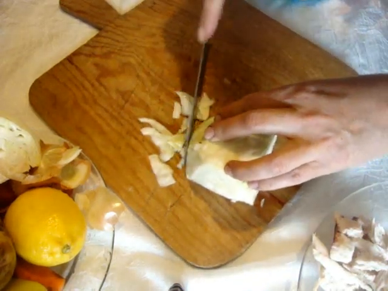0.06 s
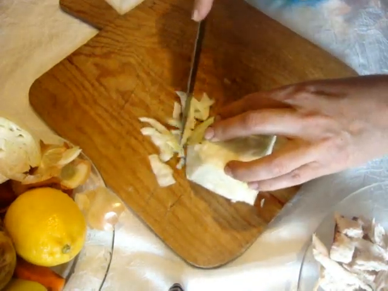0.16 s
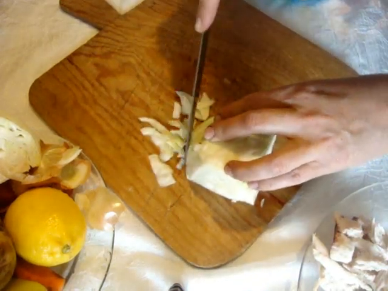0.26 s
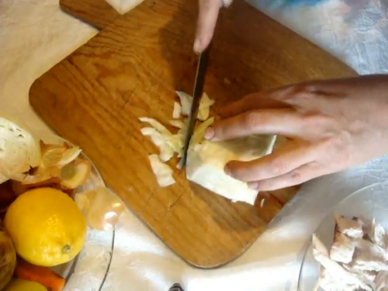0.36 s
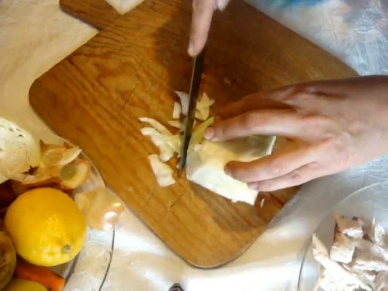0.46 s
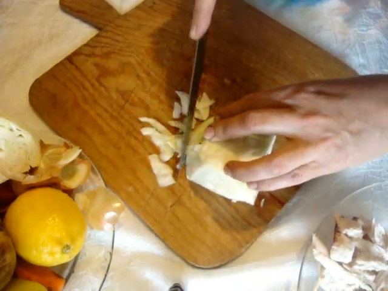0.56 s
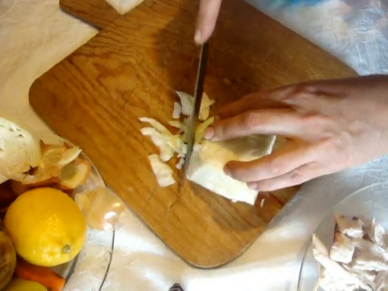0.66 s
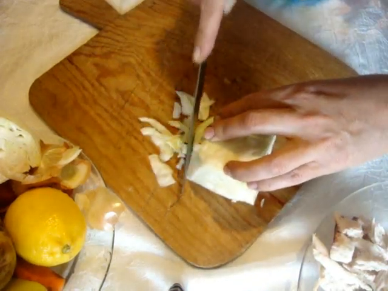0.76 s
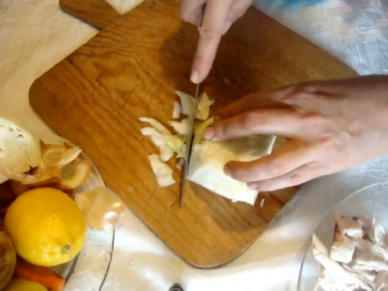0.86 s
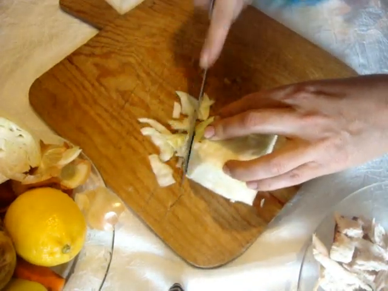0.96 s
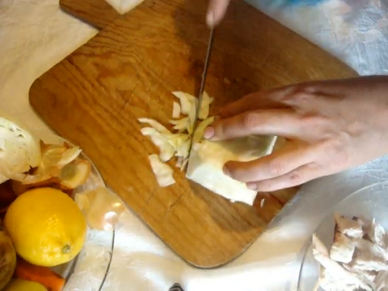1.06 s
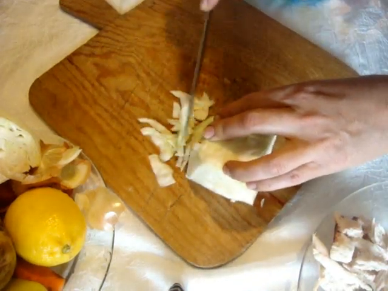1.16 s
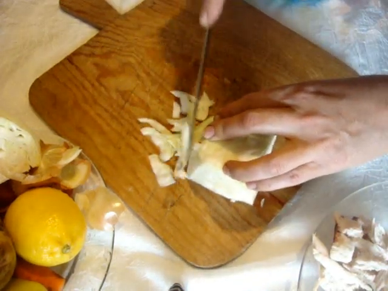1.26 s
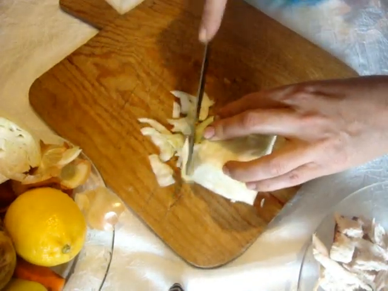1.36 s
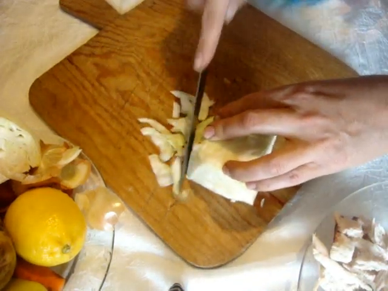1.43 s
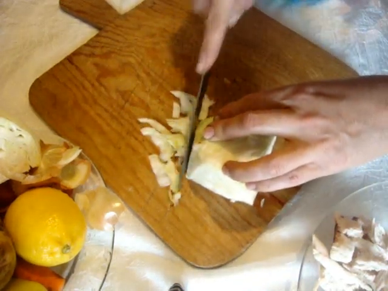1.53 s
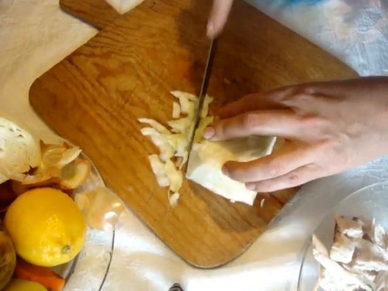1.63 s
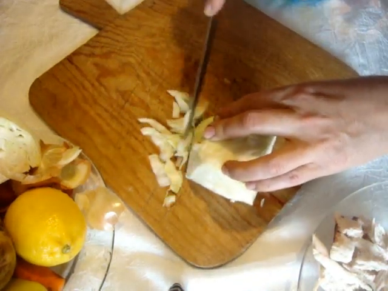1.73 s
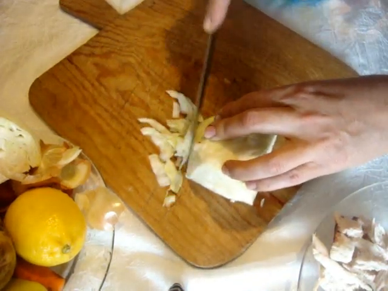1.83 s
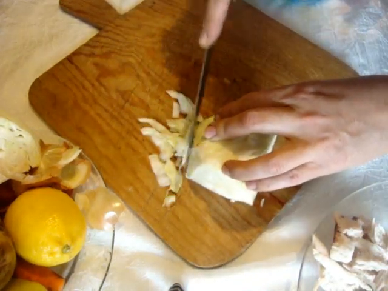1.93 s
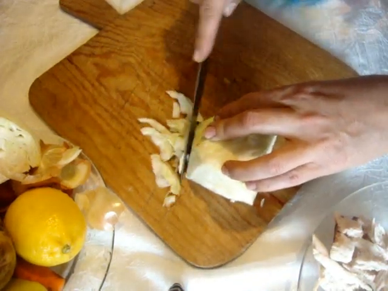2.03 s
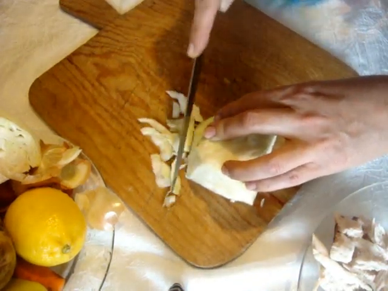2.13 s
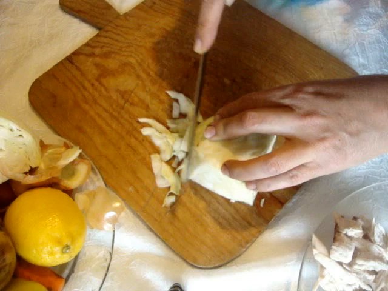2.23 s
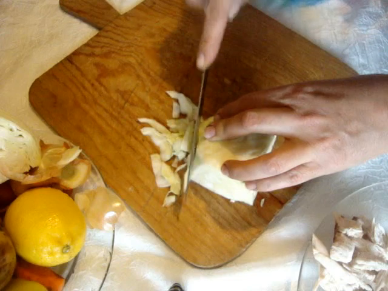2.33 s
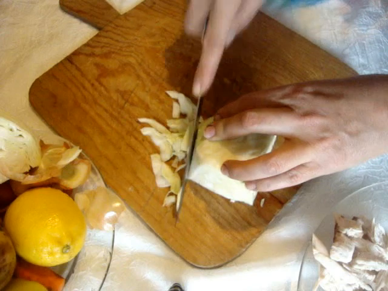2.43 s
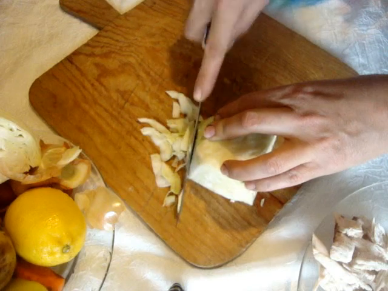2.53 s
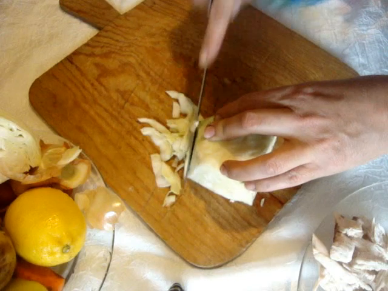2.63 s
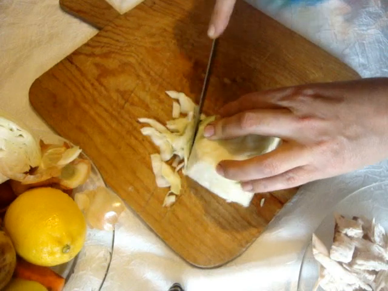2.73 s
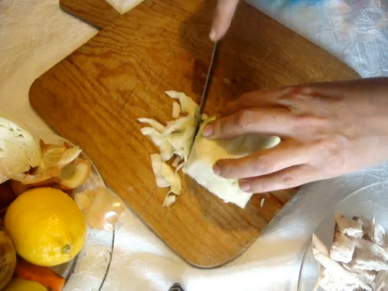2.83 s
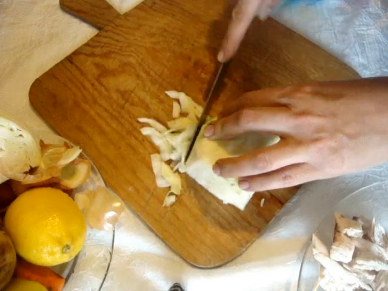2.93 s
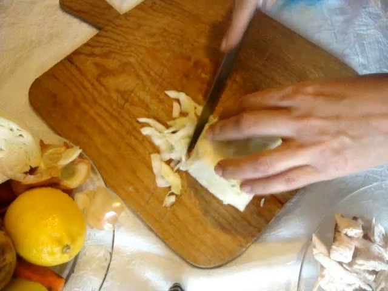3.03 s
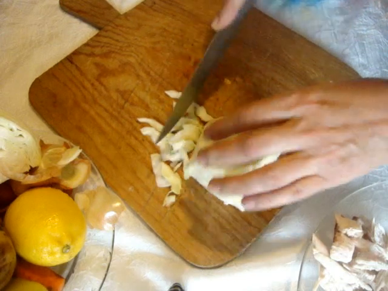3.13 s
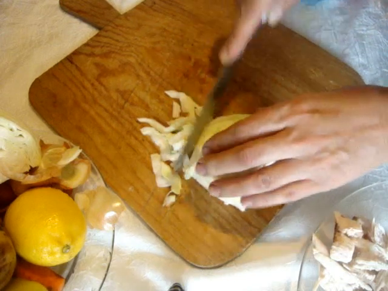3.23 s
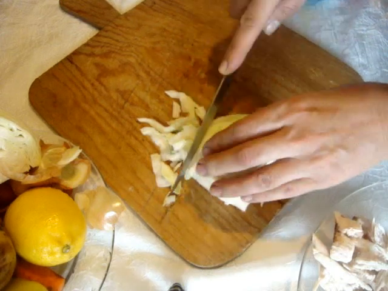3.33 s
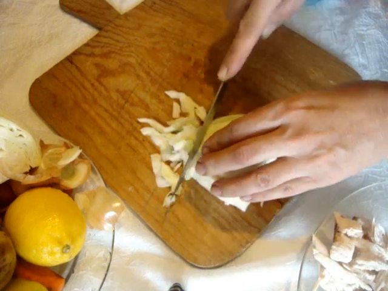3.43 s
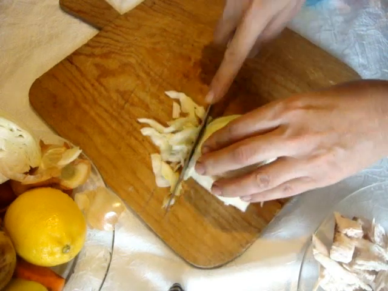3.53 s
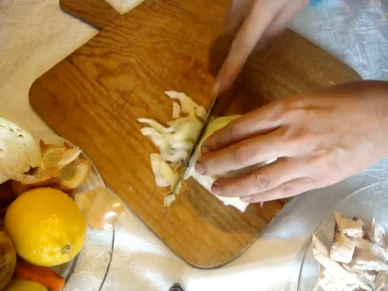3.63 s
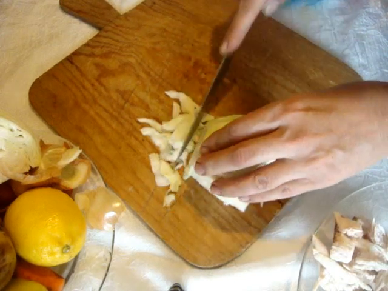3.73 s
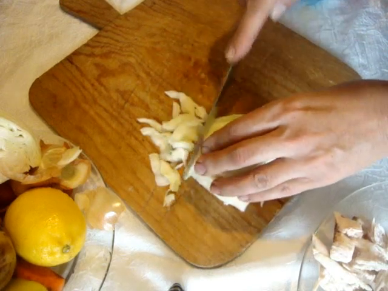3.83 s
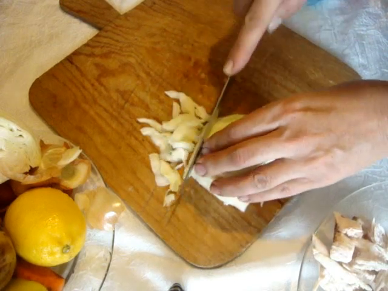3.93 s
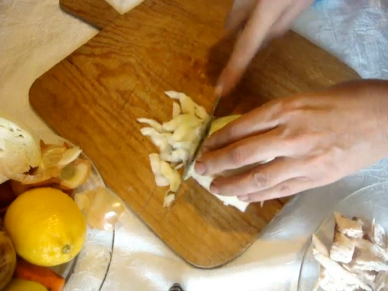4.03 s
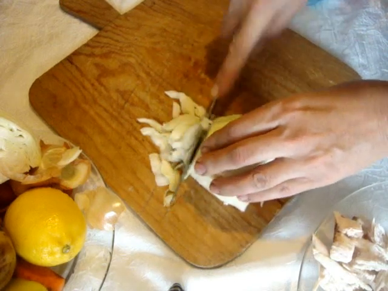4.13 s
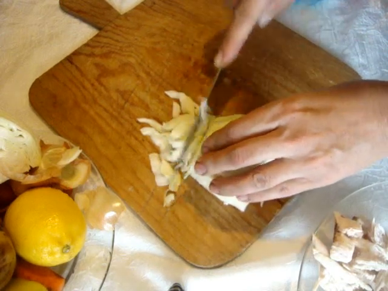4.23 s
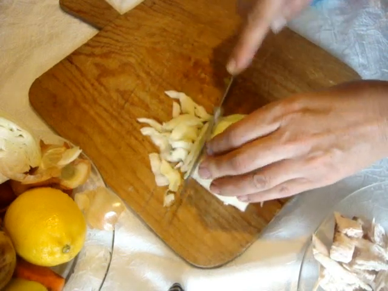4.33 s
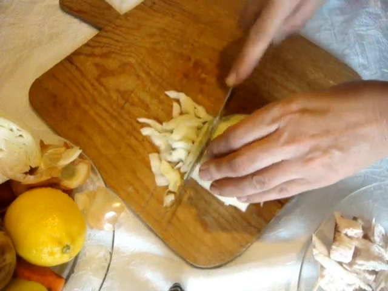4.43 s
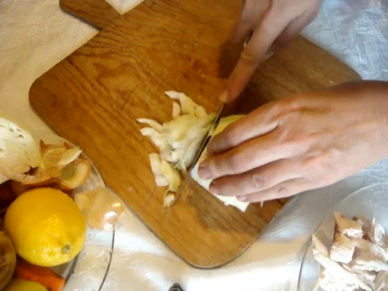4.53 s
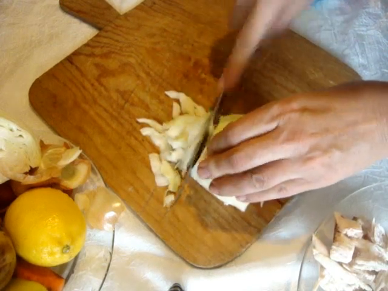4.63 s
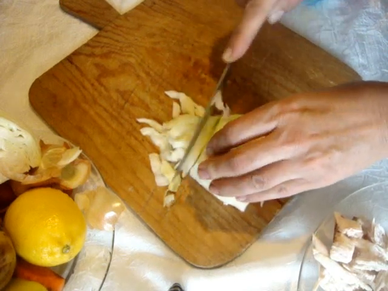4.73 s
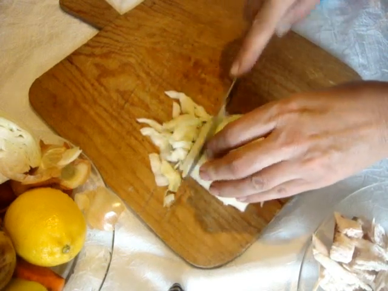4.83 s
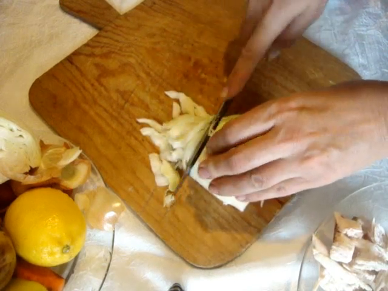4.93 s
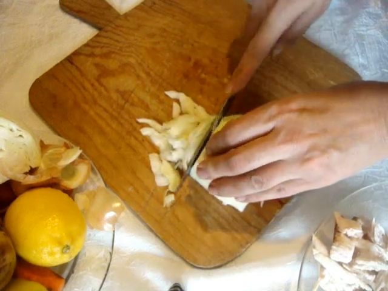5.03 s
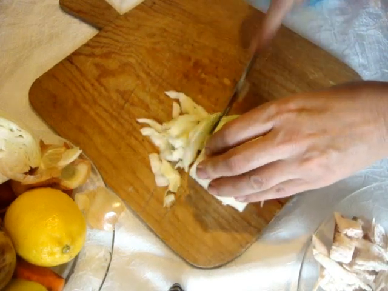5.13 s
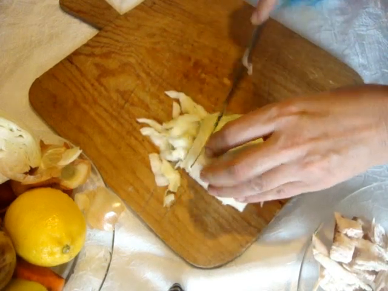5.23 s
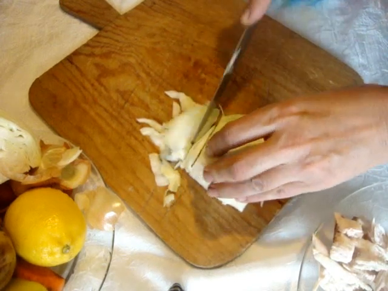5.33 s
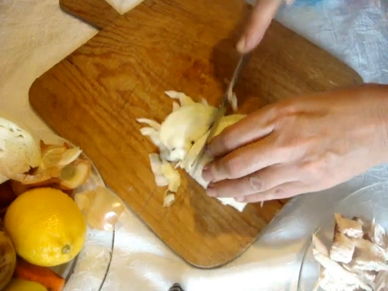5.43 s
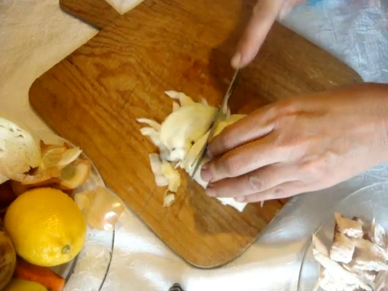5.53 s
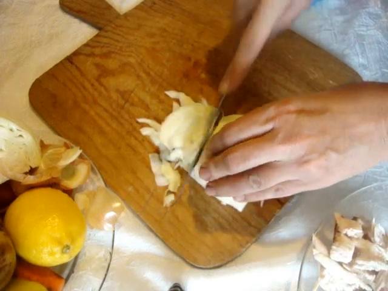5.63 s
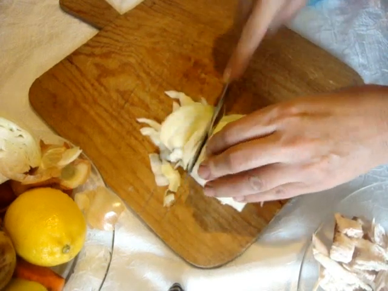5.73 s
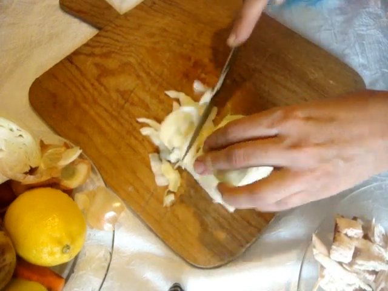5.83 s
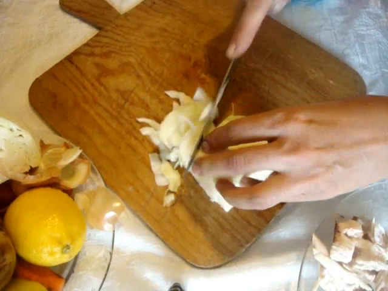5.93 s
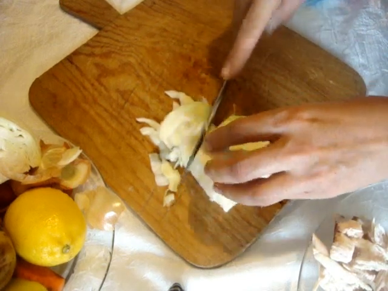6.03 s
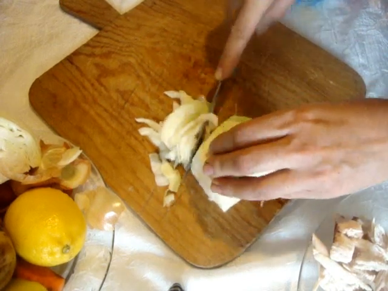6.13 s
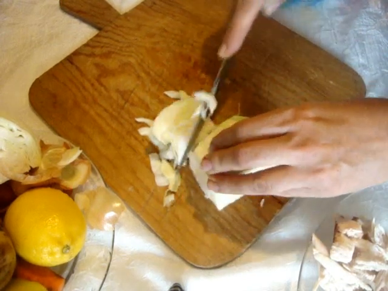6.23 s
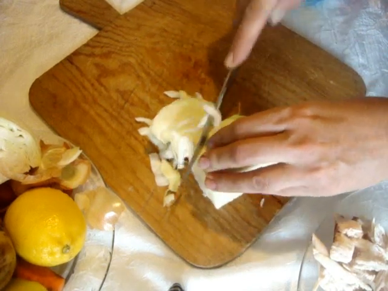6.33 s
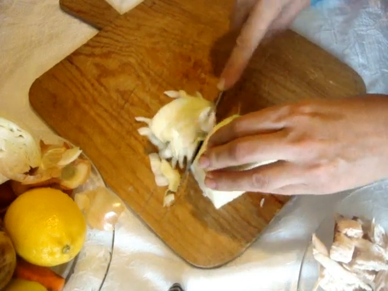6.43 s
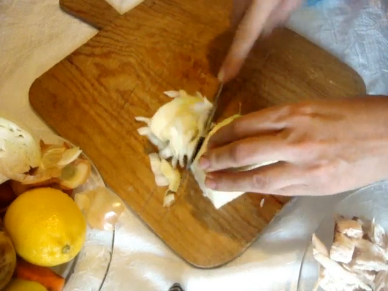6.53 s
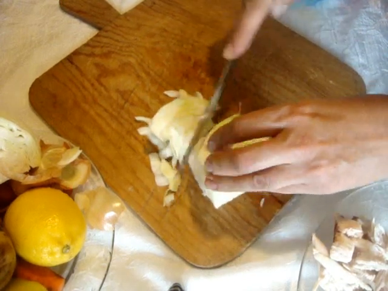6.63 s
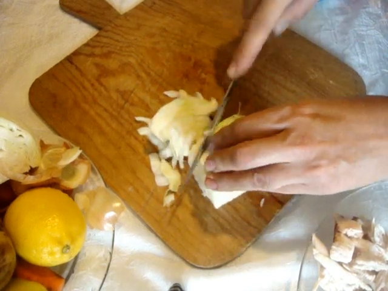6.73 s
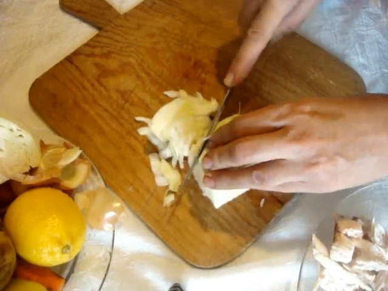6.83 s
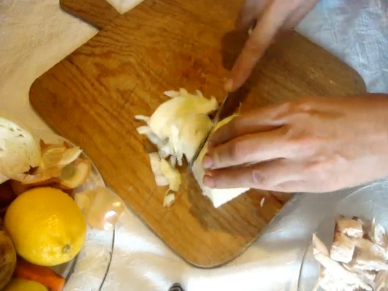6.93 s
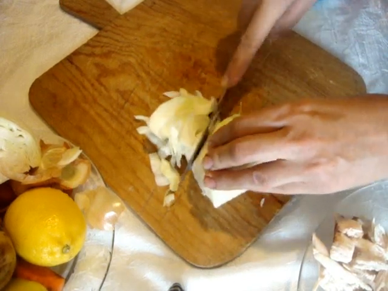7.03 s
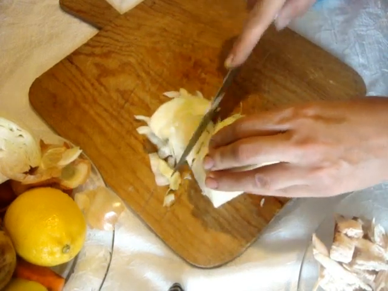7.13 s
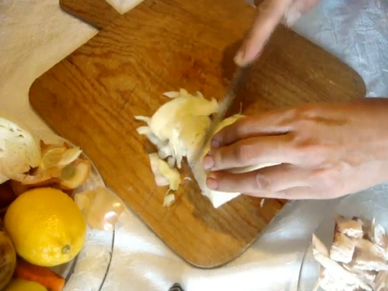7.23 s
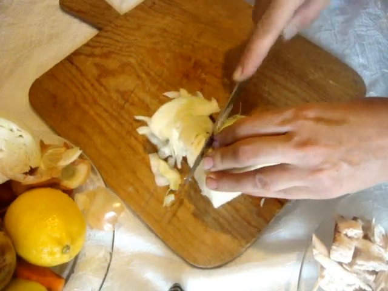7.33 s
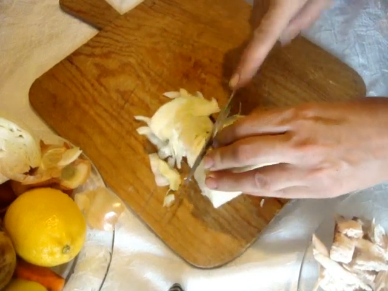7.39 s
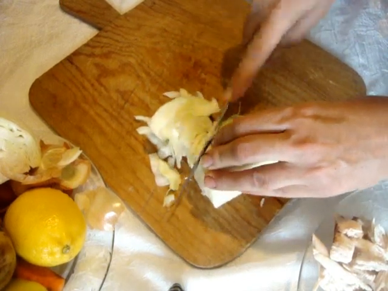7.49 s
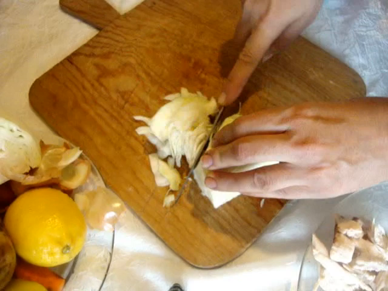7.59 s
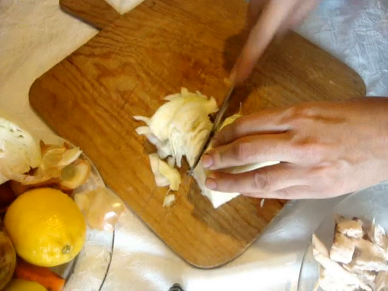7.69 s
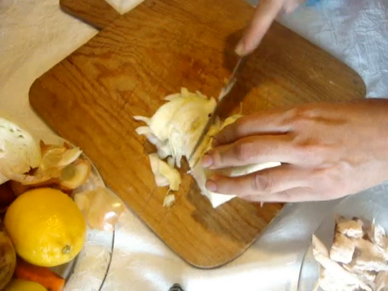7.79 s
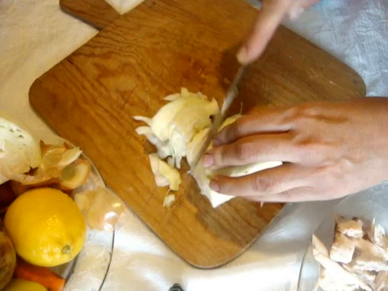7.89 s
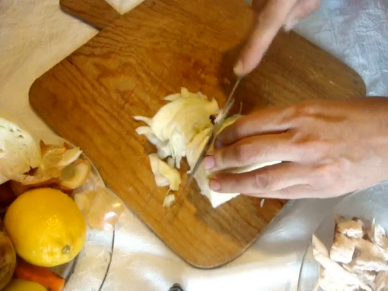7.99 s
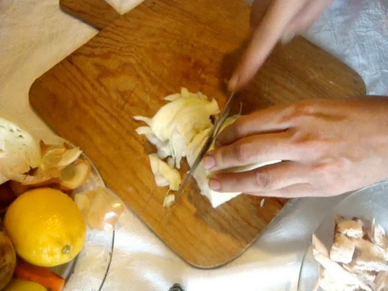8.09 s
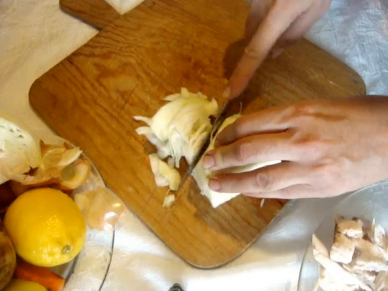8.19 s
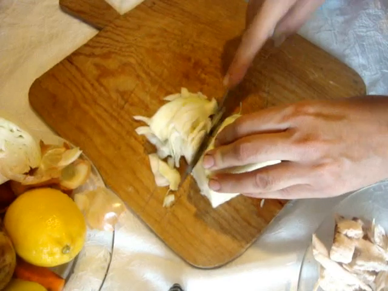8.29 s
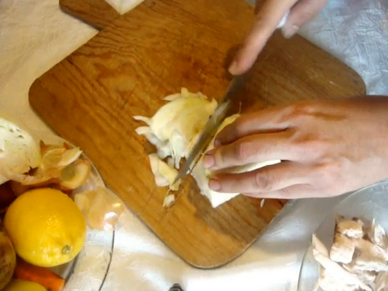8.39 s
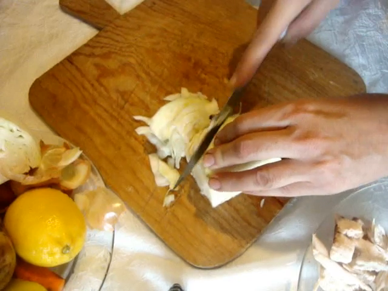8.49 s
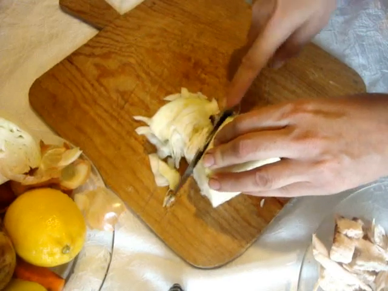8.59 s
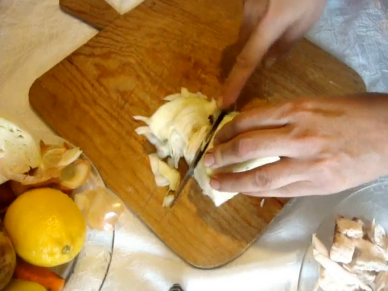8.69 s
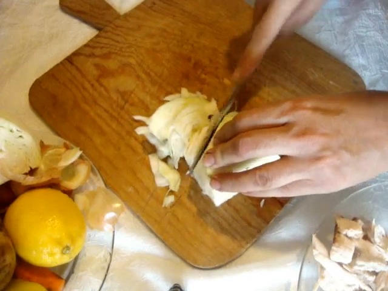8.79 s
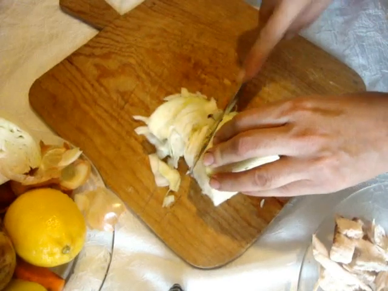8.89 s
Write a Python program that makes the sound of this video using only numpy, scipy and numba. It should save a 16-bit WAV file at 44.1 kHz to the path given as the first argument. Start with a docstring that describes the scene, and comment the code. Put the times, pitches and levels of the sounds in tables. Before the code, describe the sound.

A kitchen knife slices cabbage on a wooden board, close to the microphone in a small kitchen. About twice a second the blade rubs along the leaves, crunches through and knocks on the wood. The first strokes are lighter and uneven, then the knocks turn harder and brighter, with thick ribs snapping in short crackles. The last cuts are softer and end with a brief squeak of the blade.

```python
"""A small kitchen, the microphone close to a wooden board on which a knife slices cabbage.
In each stroke the blade rubs along the leaves, bursts their cells in a crisp crunch and knocks on the
wood. Thick ribs snap, the board thuds softly as the blade is set down, and at the end the edge squeaks.
A fast limiter flattens the hard knocks, so the room rings up behind them."""
import sys
import numpy as np
from scipy import signal
from scipy.fft import rfft, irfft
from scipy.io import wavfile
from scipy.ndimage import uniform_filter1d, minimum_filter1d
from numba import njit

SR = 44100
rng = np.random.default_rng(int(sys.argv[2]) if len(sys.argv) > 2 else 0)


def generate_wav(sig):
    """Save sig (samples, or channels by samples) to the path in sys.argv[1] as 16-bit PCM at SR."""
    pcm = np.round(np.clip(np.atleast_2d(sig).T, -1, 1) * 32767).astype(np.int16)
    wavfile.write(sys.argv[1], SR, pcm)


N = 394694
TIME = np.arange(N) / SR
TAIL = TIME[:SR // 2]  # time axis of one short sound
TOP_HZ = 10100

# Strokes down through the leaves onto the board: knock t/s, blow level/dB, contact corner f/Hz
# (low is cushioned, high is bare wood), cut length/s, level at the cut's end/dB,
# board level relative to the cut/dB, crispness (0 slides, 1 crunches)
KNIFE_STROKES = [(0.3184, -7.5, 830, 0.0023, -40.5, 3, .9), (0.779, -21.5, 770, 0.069, -32.5, -2, 0.53),
                 (1.01, -32, 2000, 0.0063, -38, 8.5, 1), (1.109, -36, 1030, .005, -67, -3.5, 0.9),
                 (1.4246, -4.5, 745, 0.107, -39, -7, 0.7), (1.526, -24.5, 840, 0.012, -53, -8, 0.2),
                 (1.9835, -11, 860, 0.0043, -35.5, -3.5, 0.3), (2.4383, -6, 1130, 0.16, -30, -8.5, 0.55),
                 (2.8604, -9, 660, .024, -34, 0.5, 1), (3.5090, 3.5, 1370, .08, -32.5, 0, .95),
                 (4.042, -0.5, 1340, 0.1, -27, 2.5, 0.77), (4.5056, 6.5, 1990, 0.097, -25, 1, 1),
                 (4.907, -3, 1480, 0.063, -31.5, -2.5, 1), (5.6236, 4, 2070, 0.083, -30.5, 4.5, 1),
                 (6.0466, -1, 1240, 0.1, -36, -2, 1), (6.4166, 2.5, 1560, 0.077, -26.5, 3, 1),
                 (6.8874, 7.5, 1660, 0.008, -22.5, -4.5, 0.9),
                 (7.4881, 1.5, 2140, 0.024, -26.5, -2.5, 0.72), (8.0801, -1.5, 1610, .038, -35, 6.5, 1),
                 (8.566, -19.5, 760, 0.16, -28.5, -4, 0.34), (8.8532, -15, 720, 0.031, -28.5, -2.5, 0.84)]
# Spectrum of bursting cells, heard through the air: f/Hz, level/dB
CELL_SPECTRUM = [(60, -17), (105, 0), (170, -3.5), (400, -14.5), (1000, 8.5), (2200, 5.5), (3500, 3),
                 (6500, 4), (10000, -3)]


def amp(db):
    """Decibels to gain."""
    return 10 ** (np.asarray(db) / 20)


def unit(response):
    """Scale a response to unit energy."""
    return response / np.sqrt(np.sum(response ** 2))


def through(x, response):
    """Pass a sound through an impulse response."""
    return signal.fftconvolve(x, response)[:len(x)]


def highpass(x, hz, order):
    """Take away the bass."""
    return signal.sosfilt(signal.butter(order, hz, "high", fs=SR, output="sos"), x)


def colour(points, size=2048):
    """Causal unit-energy response with the given spectrum (f/Hz, level/dB)."""
    hz, db = np.transpose(points)
    bin_hz = np.arange(size // 2 + 1) * SR / size
    gain = amp(np.interp(np.log(bin_hz + 1), np.log(hz), db))
    cepstrum = irfft(np.log(gain))
    cepstrum[1:size // 2] *= 2  # fold to minimum phase
    cepstrum[size // 2 + 1:] = 0
    return unit(irfft(np.exp(rfft(cepstrum))))


def add(track, s, sound):
    """Mix a short sound in at time s."""
    start = int(s * SR)
    track[start:start + len(sound)] += sound[:N - start]


def envelope(s, db, edge_s=0.0011):
    """Gain along a level curve, silent outside it."""
    return amp(np.interp(TIME, [s[0] - edge_s, *s, s[-1] + edge_s], [-120, *db, -120]))


def decay(t60):
    """Gain that falls 60 dB in t60 seconds."""
    return np.exp(-np.log(1000) * TAIL / t60)


def modes(table, phase_spread=0):
    """Sum of decaying resonances; a spread of phases blunts their common first swing."""
    return sum(amp(db) * np.cos(2 * np.pi * hz * TAIL + phase_spread * rng.standard_normal()) * decay(t60)
               for hz, db, t60 in table)


def burst(t60):
    """Noise that dies away."""
    return rng.standard_normal(len(TAIL)) * decay(t60)


def push(corner_hz):
    """Force pulse of unit area; a softer contact lasts longer."""
    force = TAIL * np.exp(-2 * np.pi * corner_hz * TAIL)
    return force / force.sum()


def flutter(per_s):
    """Random wavering curve with a spread near 1."""
    knots = np.arange(0, TIME[-1] + 1, 1 / per_s)
    return np.interp(TIME, knots, rng.standard_normal(len(knots)))


def clicks(per_s, scatter_db):
    """Tiny clicks of unequal size, rms 1."""
    sizes = amp(scatter_db * np.minimum(rng.exponential(size=N), np.pi)) * rng.choice([-1, 1], N)
    train = sizes * (rng.random(N) < per_s / SR)
    return train / train.std()


def room_tone(waver_db=-1.96):
    """Faint room noise and microphone hiss, wavering slightly."""
    # Spectrum of the noise floor: f/Hz, level/dB
    floor_spectrum = [(15, -47.5), (25, -14.5), (168, -10.5), (221, -4), (264, -12.5), (299, -2),
                      (414, -8.5), (447, -1.5), (506, -5.5), (972, -6.5), (1160, -9.5), (2340, -13),
                      (10000, -18), (13000, -75.5), (22000, -120)]
    # Its slow drift: t/s, level/dB
    floor_levels = [(0, -54.5), (4.2, -54.5), (6.8, -58), (8.95, -56.5)]
    db = np.interp(TIME, *np.transpose(floor_levels)) + waver_db * flutter(12)
    return through(rng.standard_normal(N), colour(floor_spectrum)) * amp(db)


def reverberation():
    """Diffuse reflections; the middle of the spectrum lingers longest."""
    # Decay of the kitchen by band: f/Hz, t60/s
    room_decay = [(250, 0.18), (700, 0.28), (1200, 0.25), (2000, 0.24), (5000, .2)]
    hz, t60s = np.transpose(room_decay)
    bin_hz = np.arange(len(TAIL) // 2 + 1) * SR / len(TAIL)
    spectrum = sum(rfft(burst(t60)) * np.sqrt(np.interp(bin_hz, hz, band))
                   for t60, band in zip(t60s, np.eye(len(hz))))
    fade = np.minimum(1, 2 * np.linspace(1, 0, len(TAIL))) ** 2
    return fade * irfft(spectrum, len(TAIL))


def board_response(hollow_db, spot_db=1.5, crack_db=-19, wash_db=17, ring_db=-26, build_s=0.0034):
    """One spot of the board: short wood modes and a crack, then the ring of table and kitchen."""
    # Bending of the whole board on the table, then its stiffer modes: f/Hz, level/dB, t60/s
    board_modes = [(293.4, -26.5, 0.081), (458, -24, 0.046), (509.5, -10.5, 0.039), (771, -4.5, 0.047),
                   (948, 0.5, 0.023), (1152, -2, 0.025), (1354, 0, 0.025), (1563, 6, 0.013),
                   (1828, 2, 0.025), (2064, -21, 0.035), (2527, -3.5, 0.015)]
    # Diffuse sound of a knock in the kitchen: f/Hz, level/dB
    wash_spectrum = [(60, -41), (180, -13), (280, -6.5), (600, 5), (1200, 9.5), (2000, 6.5), (2600, 3.5),
                     (3300, -3.5), (5200, 1.5), (7500, -15), (10000, -61.5)]
    # Resonances that linger in the table and the kitchen: f/Hz, level/dB, t60/s
    ring_modes = [(250.5, -16, 0.28), (280, -6.5, 0.24), (337, -11, 0.17), (423.3, -2, 0.21),
                  (547, 2.5, 0.23), (755, 3, 0.26), (901, 1.5, 0.21), (996, -7.5, 0.35), (1031, 1.5, 0.14),
                  (1184, 2.5, 0.32), (1267, 8.5, 0.31), (1289, 4.5, 0.16), (1334, -2, 0.1), (1375, 8, 0.18),
                  (1445, -8, 0.21), (1505, 4, 0.21), (1775, 8, 0.075), (1917, 7.5, 0.23), (2070, 4, .22),
                  (2490, -2.5, 0.12)]
    spot_modes = [(hz, db + spot_db * rng.standard_normal(), t60) for hz, db, t60 in board_modes]
    wood = modes(spot_modes, phase_spread=0.71)
    build = 1 - np.exp(-TAIL / build_s)
    wash = amp(wash_db) * unit(through(reverberation(), colour(wash_spectrum)) * build)
    crack = amp(crack_db) * burst(t60=0.0073)
    ring = amp(ring_db) * modes(ring_modes) * build
    flex = colour([(800, hollow_db), (1600, 0)], size=512)  # an unsupported spot bends more
    sound = through(wood + crack + wash + ring, flex)
    return highpass(sound, hz=240, order=4)  # a small board radiates little bass


def cutting(edge_s, swell_db_per_s=112, on_board=False, entry_s=0.011, entry_db=-16):
    """Gains of crunch and sliding: the edge bites, the cut swells with depth, the board stops it dead."""
    crisp, smooth = np.zeros(N), np.zeros(N)
    for s, _, _, length, db, body_db, crispness in KNIFE_STROKES:
        first_db = db - swell_db_per_s * length
        gain = envelope([s - length - entry_s, s - length, s], [first_db + entry_db, first_db, db], edge_s)
        gain *= amp(body_db * on_board)
        share = np.clip(crispness, 0, 1)
        crisp += gain * np.sqrt(share)
        smooth += gain * np.sqrt(1 - share)
    return crisp, smooth


def rubs(body, air_db=2, body_db=-4, blade_db=-6, judder_db=1, speed_power=1.44, cut_rasp_db=-2):
    """Fine, dense friction that swells and fades with the speed of the blade."""
    # The flat of the blade drawn along the cut face: fastest t/s, length/s, level/dB, relative rasp/dB
    slides = [(0.015, 0.16, -45.5, 6.5), (0.281, 0.025, -46.5, -2.5), (0.669, 0.17, -50, -4),
              (0.952, 0.25, -40.5, 3.5), (1.008, .03, -42, 14), (1.587, 0.21, -41.5, 7),
              (2.612, 0.3, -47, -12), (2.967, 0.067, -49.5, 2), (3.64, 0.15, -48.5, 9),
              (5.089, 0.3, -44, 7.5), (7.39, .26, -39, -2), (7.654, 0.16, -45.5, -14),
              (8.758, 0.092, -49, -17), (8.896, 0.1, -35, -2)]
    # Wet steel on leaf: f/Hz, level/dB
    hiss_spectrum = [(80, -37), (400, -10), (900, 3), (2150, 0), (3000, 1.5), (6500, 0.5), (10000, -7.5)]
    # Resonances of the rubbed blade: f/Hz, level/dB, t60/s
    blade_modes = [(1414, 6.5, 0.012), (1594, 1.5, 0.013), (1702, -4, 0.062), (1816, -22.5, .03)]
    friction = clicks(per_s=14000, scatter_db=7.5) * amp(judder_db * flutter(200))
    _, sliding = cutting(edge_s=0.0067)
    drag = friction * sliding
    rasp = drag * amp(cut_rasp_db)
    for fastest, length, db, rasp_db in slides:
        speed = np.maximum(0, 1 - np.abs(TIME - fastest) / (length / 2))
        slide = amp(db) * speed ** speed_power * friction
        drag += slide
        rasp += slide * amp(rasp_db)
    hiss = amp(air_db) * through(drag, colour(hiss_spectrum))
    wood = amp(body_db) * through(drag, body)
    steel = amp(blade_db) * through(rasp, unit(modes(blade_modes)))
    return hiss + wood + steel


def clusters(x, patchy_db=4.0, patches_per_s=130, bands=7):
    """Cells of one size burst together, so each band swells on its own."""
    spectrum, hz = rfft(x), np.arange(N // 2 + 1) * SR / N
    centres = np.linspace(0, TOP_HZ, bands)
    return sum(irfft(spectrum * np.interp(hz, centres, band), N) * amp(patchy_db * flutter(patches_per_s))
               for band in np.eye(bands))


def crunch(body, air_db=1.5, body_db=-2, layer_db=3.5, layers_per_s=220):
    """Cells burst in clusters, leaf after leaf; the blade carries each burst down into the board."""
    bursts = clusters(clicks(per_s=9000, scatter_db=5.0)) * amp(layer_db * flutter(layers_per_s))
    air_gain, _ = cutting(edge_s=0.0042)
    wood_gain, _ = cutting(edge_s=0.0054, swell_db_per_s=51, on_board=True)  # swells more slowly
    air = amp(air_db) * through(bursts * air_gain, colour(CELL_SPECTRUM))
    wood = amp(body_db) * through(bursts * wood_gain, body)
    return air + wood


def knocks(hollow_db_per_octave=5, neutral_hz=1223):
    """The blade breaks through the last leaf and strikes the wood, each time at a new spot."""
    out = np.zeros(N)
    for s, db, corner_hz, *_ in KNIFE_STROKES:
        # a cushioned blow sounds hollow, a bare one thin
        hollow_db = hollow_db_per_octave * np.log2(neutral_hz / corner_hz)
        add(out, s, amp(db) * through(push(corner_hz), board_response(hollow_db)))
    return out


def tear(t60, rise_s=0.00094):
    """Envelope of a fibre that gives way."""
    return decay(t60) * (1 - np.exp(-TAIL / rise_s))


def snaps(body, snap_db=-6, body_db=-2, thin_t60=0.023, thin_db=-27, doubling_db=11,
          veins_per_s=35, vein_db=5):
    """Ribs give way in a short crackle, the thicker the longer; thin veins go at random in the cuts."""
    # Thick ribs snapping: t/s, level/dB, relative board level/dB
    ribs = [(0.9964, -31, 2), (3.3977, -27.5, 9.5), (3.4238, -21.5, 3), (4.3513, -24.5, 5.5),
            (4.389, -23.5, -1), (4.415, -18.5, 8), (4.802, -28.5, 3.5), (5.508, -24, -3.5),
            (6.036, -14.5, -6.5), (6.3304, -25, -5), (6.6787, -26.5, 5.5), (6.708, -20, 2.5),
            (6.724, -15, 7), (6.744, -24.5, 3), (6.756, -19, 6), (6.776, -21.5, 5), (6.908, -12.5, -7),
            (7.3182, -17.5, 0), (7.3323, -15.5, 7), (7.3578, -16.5, 3.5), (7.379, -19.5, 5),
            (7.396, -17.5, 0.5), (7.4144, -17.5, 2.5), (7.443, -14, 3), (7.972, -25, 5), (8.0288, -23, 1.5),
            (8.0465, -17.5, 7.5)]
    depth, _ = cutting(edge_s=0.0062, swell_db_per_s=43)
    vein_breaks = rng.random(N) < veins_per_s / SR
    air_gain = through(amp(vein_db) * depth * vein_breaks, tear(thin_t60))
    wood_gain = air_gain * amp(body_db)
    for s, db, board_db in ribs:
        t60 = thin_t60 * 2 ** ((db - thin_db) / doubling_db)
        snap = amp(db + snap_db) * tear(t60)
        add(air_gain, s, snap)
        add(wood_gain, s, snap * amp(board_db + body_db))
    crackle = rng.standard_normal(N)
    air = through(clusters(crackle * air_gain), colour(CELL_SPECTRUM))
    return air + through(crackle * wood_gain, body)


def nudges(thud_hz=125, thud_t60=0.035, press_t60=0.16):
    """Dull thuds as the cabbage is pressed against the board."""
    # The blade is set down on the cabbage: t/s, level/dB
    presses = [(3.854, -52), (4.319, -50), (4.778, -55), (5.932, -52), (6.646, -59), (7.936, -49.5)]
    force = np.zeros(N)
    for s, db in presses:
        add(force, s, amp(db) * burst(press_t60))
    thud = through(modes([(thud_hz, 0, thud_t60)]), push(corner_hz=400))
    return through(force, unit(thud))


def squeak(db_per_harmonic=-5, waver=0.035, rough_db=2.0, harmonics=5):
    """Uneven stick and slip that slows with the blade."""
    # The edge drags to rest: t/s, slip f/Hz, level/dB
    glide = [(8.858, 1850, -46), (8.872, 1500, -35), (8.886, 1200, -30), (8.9, 950, -36), (8.92, 760, -46)]
    s, hz, db = np.transpose(glide)
    slip_hz = np.interp(TIME, s, hz) * (1 + waver * flutter(700))
    phase = 2 * np.pi * np.cumsum(slip_hz) / SR
    grip = envelope(s, db) * amp(rough_db * flutter(300))
    return grip * sum(amp(db_per_harmonic * k) * np.sin((k + 1) * phase) for k in range(harmonics))


def scene(leaf_room_db=-16):
    """Knife, cabbage and board close up in mono, with the kitchen walls behind them."""
    board = board_response(hollow_db=-1.5, spot_db=-2.5)
    body = unit(through(board, push(corner_hz=950)))  # the cabbage cushions what reaches the wood
    leaves = crunch(body) + snaps(body) + rubs(body) + squeak()
    walls = amp(leaf_room_db) * through(leaves, unit(burst(t60=0.44)))
    return (knocks() + leaves + walls + nudges() + room_tone())[None]


@njit
def follow(size, keep):
    """Peak follower: rises at once and sinks slowly."""
    out, held = np.empty(len(size)), 0.
    for i in range(len(size)):
        held = max(size[i], held * keep)
        out[i] = held
    return out


def record(dry, ceiling_db=-3, release_s=0.008, low_cut_hz=60, smooth_samples=24):
    """A fast limiter holds the knocks down; the small microphone loses bass and the top is cut off."""
    peak = follow(np.abs(dry[0]), np.exp(-1 / (release_s * SR)))
    gain = np.minimum(1, amp(ceiling_db) / (peak + 1e-9))
    gain = uniform_filter1d(minimum_filter1d(gain, smooth_samples), smooth_samples)
    sound = highpass(dry * gain, low_cut_hz, order=1)
    return signal.sosfilt(signal.ellip(12, 0.2, 80, TOP_HZ, fs=SR, output="sos"), sound)


dry = scene()
out = record(dry)
generate_wav(out)
```